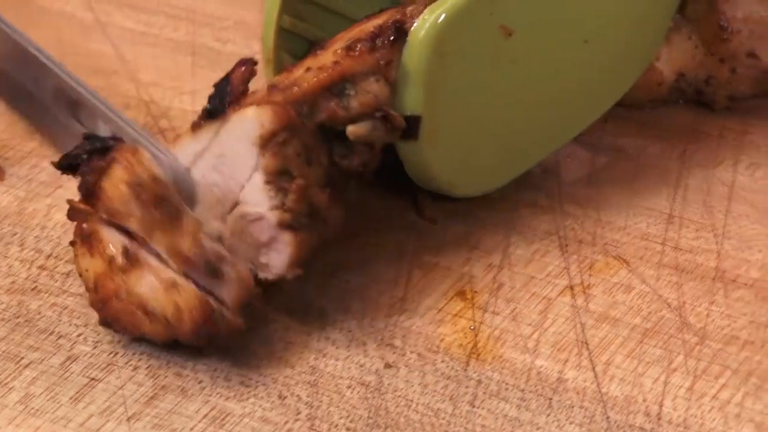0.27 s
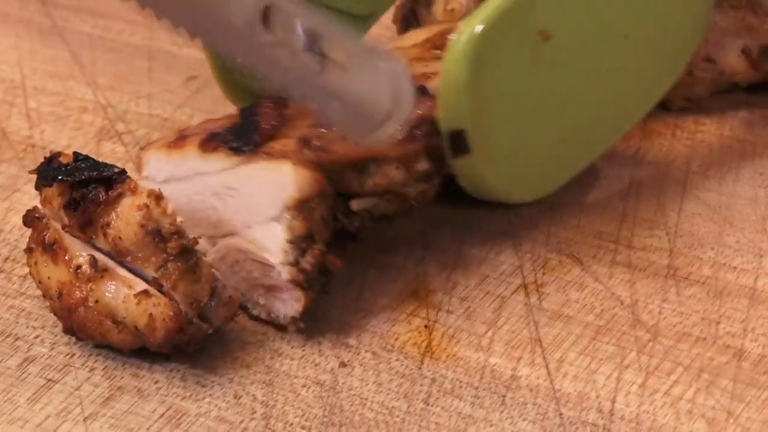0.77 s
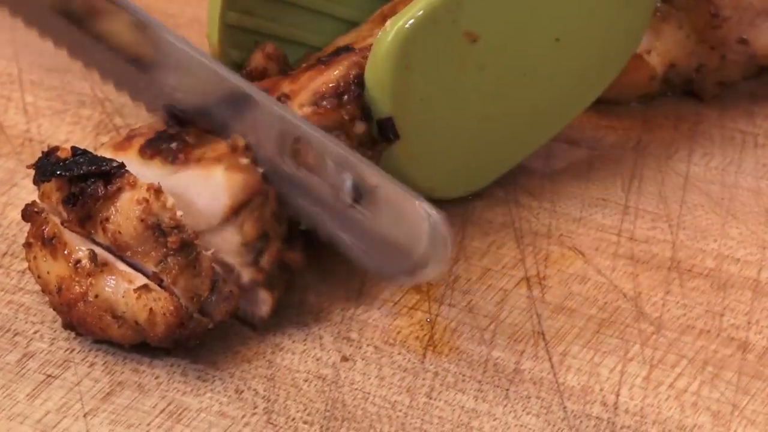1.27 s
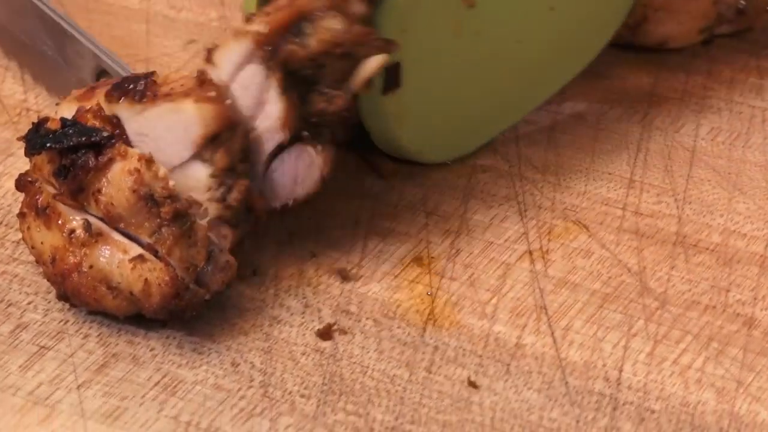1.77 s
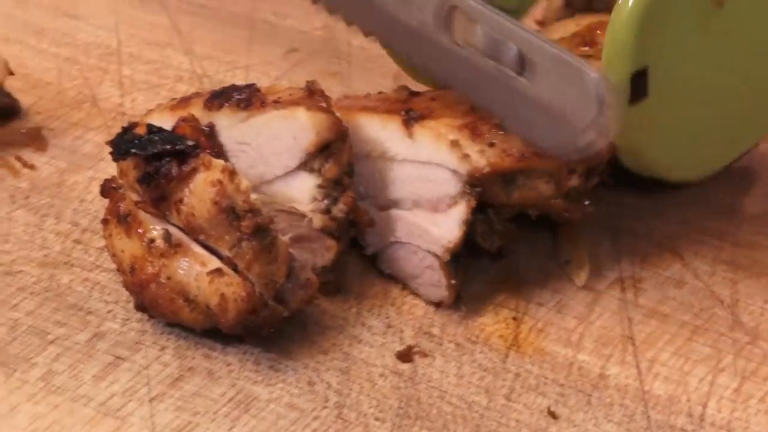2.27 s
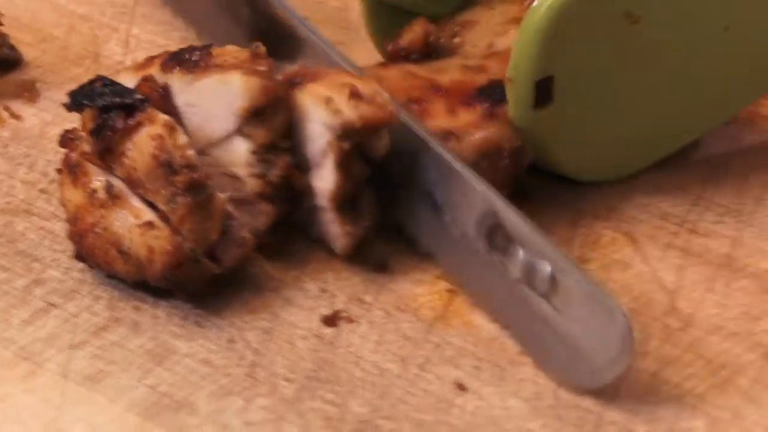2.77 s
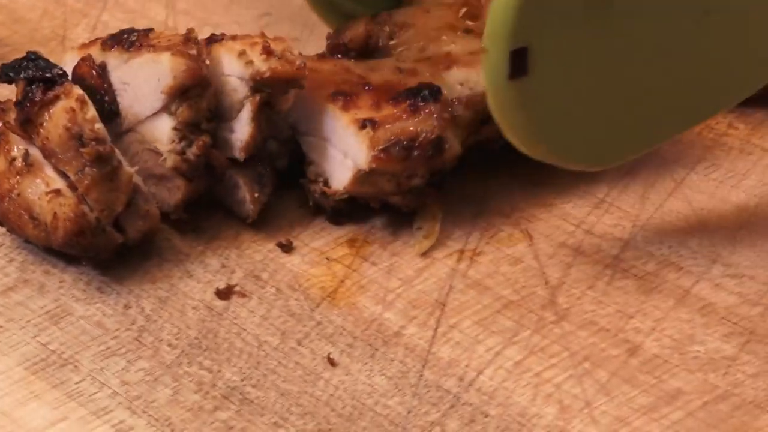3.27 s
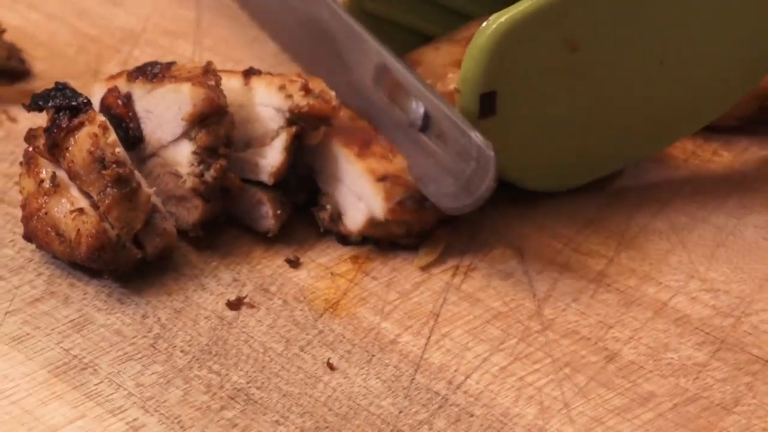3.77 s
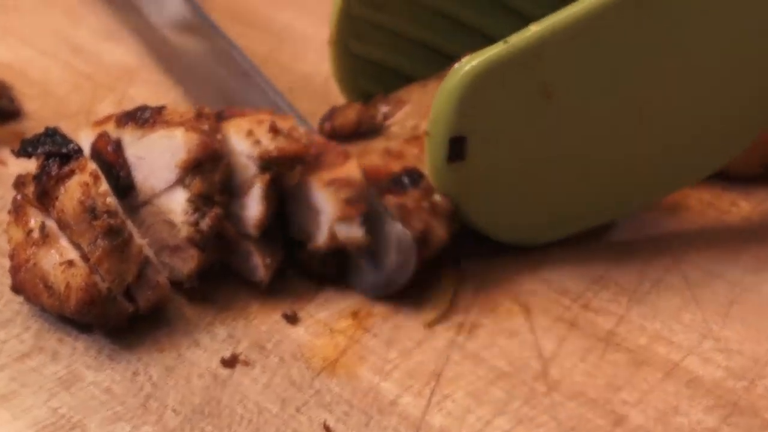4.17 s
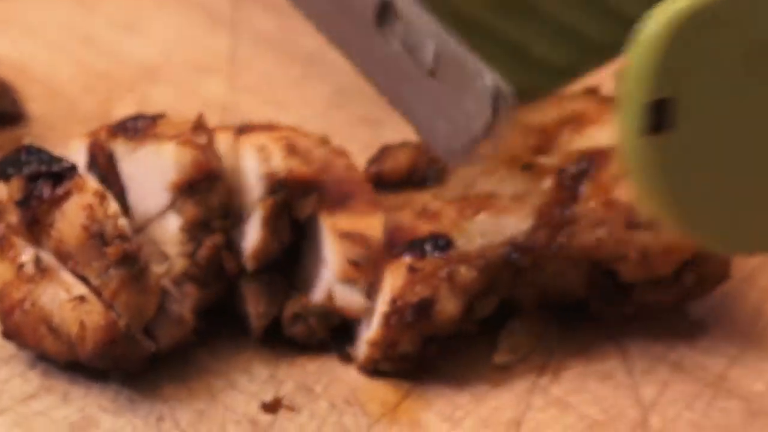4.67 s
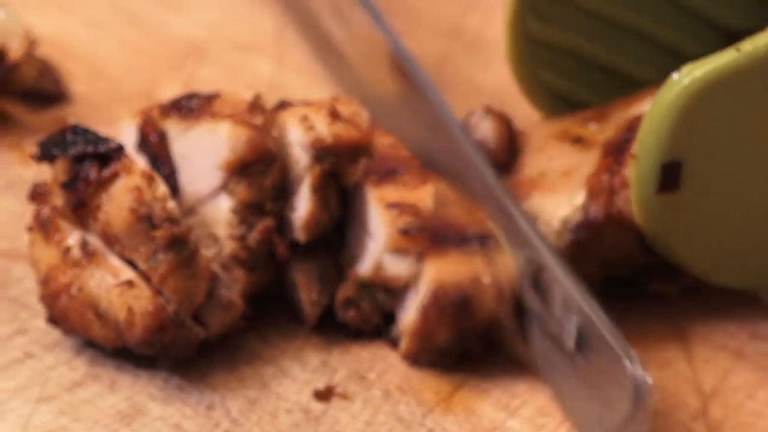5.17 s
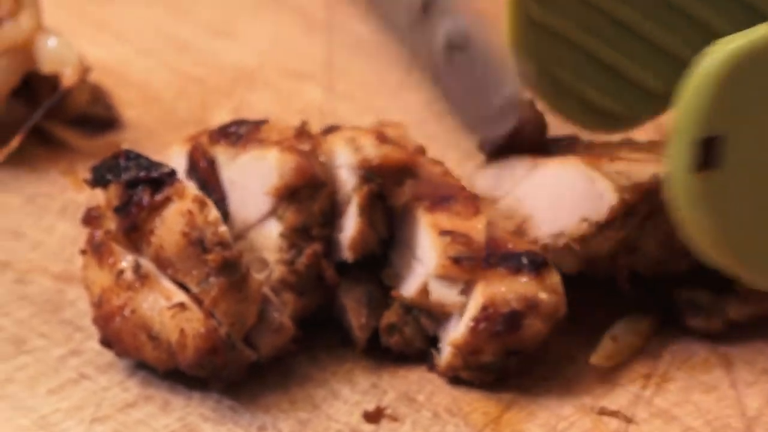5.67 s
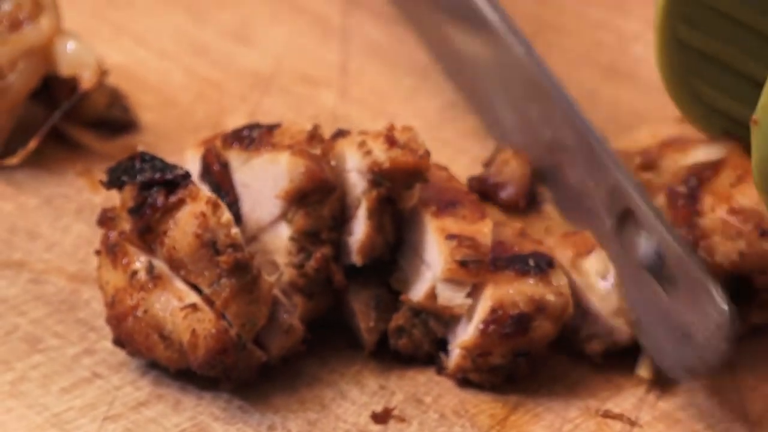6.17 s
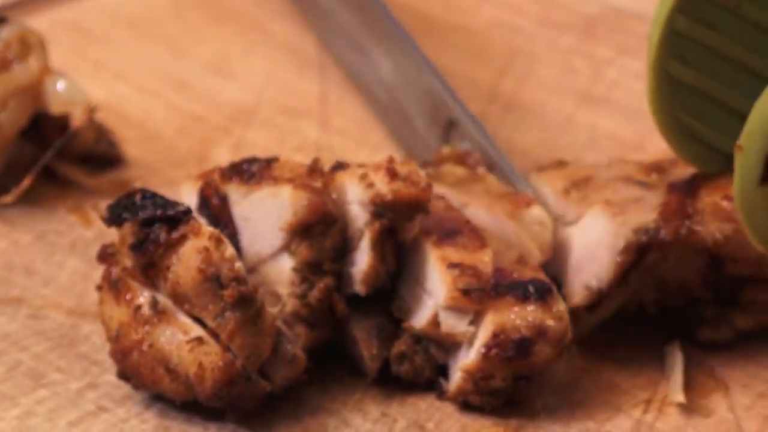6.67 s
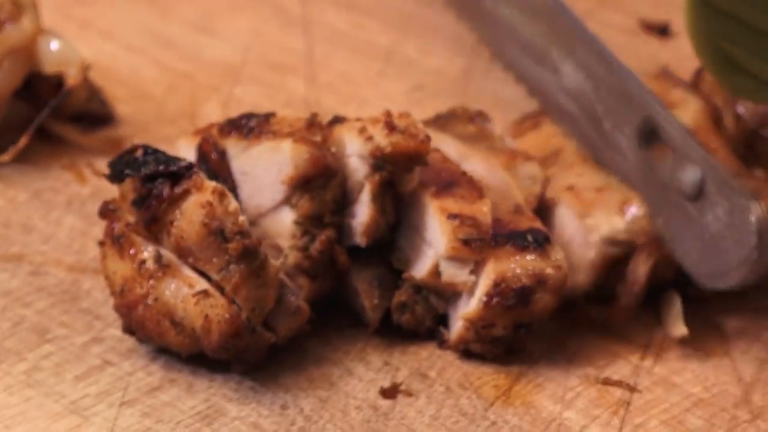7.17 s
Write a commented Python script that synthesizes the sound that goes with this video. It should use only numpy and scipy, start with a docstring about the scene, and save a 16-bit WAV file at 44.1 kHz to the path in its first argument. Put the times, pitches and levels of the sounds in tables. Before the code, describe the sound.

An electric knife is already running and cutting at 0 s, close to a mono microphone in a kitchen with a faint, short, dull reverberation. The motor strains in a rough buzzing grind, with small board thumps, until the blades lift at about 0.35 s. Freed, they clatter brightly and fast, with metallic hiss; the speed climbs, stumbling briefly near 0.75 s. Slices follow at roughly 1.3-1.9, 2.6-3.2, 3.8-4.4, 5.1-5.6 and 6.2-6.75 s. Each begins with blades slapping on the skin and a thin rising whine, then the clatter is damped, the pitch sags, and gears sing coarsely over pulsing steel swishes, with dull snags near the end. Between slices the loud rattle returns and the motor recovers, with gear and ringing swells around 2.3, 3.55, 4.9, 6.05 and 7.15 s. A last cut starts at 7.3 s and the buzz ends abruptly, unfinished, around 7.4 s.

```python
"""At a kitchen worktop, heard close in one channel with a faint wash from the walls, an electric knife saws chicken.
It runs without a stop: the end of one slice, five whole slices and the start of another, on a wooden board.
A small motor turns a worm wheel that shuttles two blades about 40 to 46 times a second. In the air the loose
blades clatter, made of noise bursts; in the meat they are pressed tight, the motor sags, the gear sings in
repeating tooth flaws and the blades swish once a stroke in coloured noise. Drone, hum, mesh and whine are sines."""
import sys
import numpy as np
from scipy import signal
from scipy.fft import rfft, irfft
from scipy.io import wavfile
from scipy.ndimage import uniform_filter1d

SR = 44100
rng = np.random.default_rng(int(sys.argv[2]) if len(sys.argv) > 2 else 0)


def file_out(sig):
    """Save sig as 16-bit WAV at sys.argv[1]."""
    # one column per channel
    cols = np.atleast_2d(sig).T
    # limit, then scale
    lim = np.clip(cols, -1, 1)
    pcm = np.round(lim * 32767).astype(np.int16)
    wavfile.write(sys.argv[1], SR, pcm)


N = 327222

# Partials of the drone that the regular clatter of the free blades makes:
# (order [multiples of the stroke rate]) and (relative level [dB])
DRONE_ORDERS = [11, 13, 14, 15, 16, 18, 19, 20, 23, 27, 28, 29, 33]
DRONE_PARTIAL_DB = [-16, -12, 0, -12, -4.5, -2, -10, -10, -13, -6.5, -9, -10, -12]
# Partials of the gear mesh: (order [multiples of the stroke rate]) and (relative level [dB])
MESH_ORDERS = [21, 24, 30, 36]
MESH_PARTIAL_DB = [-1.3, -11, -9, -9]
HUM_ORDER, WHINE_ORDER = 10.5, 84  # multiples of the stroke rate

# Swells of the mesh tone and of the whine as the blades bite:
# (start [s], full [s], breaks off [s], level when full [dB], level at the end [dB])
MESH_SWELLS = [(-.1, 0, .34, -44.5, -45.5), (1.44, 1.54, 1.92, -46, -44), (2.8, 2.89, 3.13, -40.5, -46),
               (3.86, 3.93, 4.06, -44.5, -44), (4.06, 4.11, 4.36, -39.5, -50),
               (5.28, 5.39, 5.6, -43.5, -46), (6.37, 6.48, 6.72, -45, -44)]
WHINE_SWELLS = [(1.3, 1.48, 1.62, -42, -44.5), (1.72, 1.78, 1.93, -50, -49), (2.1, 2.35, 2.62, -48, -49),
                (2.62, 2.77, 2.92, -41, -42), (3.92, 4.0, 4.17, -40.5, -45), (4.85, 5.1, 5.17, -43, -43.5),
                (5.17, 5.21, 5.44, -41, -50), (5.98, 6.26, 6.57, -42.5, -43), (6.98, 7.22, 7.5, -42, -44)]
STEADY_WHINE_DB, STEADY_MESH_DB, RELEASE_S = -53, -58, .045

# The slices: (blades enter [s], meat clamps them [s], fully buried [s], lifted out [s], drag [strokes/s])
SLICES = [(-.4, -.2, -.1, .366, 1.716), (1.311, 1.41, 1.593, 1.919, 2.953),
          (2.582, 2.83, 2.93, 3.165, 2.998), (3.799, 3.91, 4.042, 4.36, 3.238),
          (5.093, 5.24, 5.475, 5.63, 3.584), (6.199, 6.45, 6.52, 6.753, 3.267),
          (7.308, 7.5, 7.554, 7.8, 2.558)]
LIFT_S = .1  # time to pull the blades out of the meat
LEAN_S = .35  # the blades lean on the skin this long before they enter
CLAMP_S, CLAMP_SHARE = .03, .35  # how fast the clamp closes; its share (0-1) of the damping

# The motor creeps up to its top speed and answers a load with a lag
TOP_SPEED, START_SHORTFALL = 46.41, 3.77  # strokes/s
START_SAG = 2.37  # strokes/s lost to the cut already under way
RUN_UP_S, MOTOR_LAG_S = 3.014, .308
# The motor's one stumble: (start [s], slowest [s], speed lost [strokes/s], recovery [s])
STUMBLE = (.72, .80, 3.26, .294)

# Base loudness of each part: (in the air [dB], entering [dB], buried [dB], per sag [dB per stroke/s],
# per run-up still to go [dB per stroke/s], per unit of swell [dB])
PART_LEVELS = { "clatter": (-35, -34, -41.5, 0.2, 0.44, -0.5), "gear": (-35, -36, -26, -3, -1.2, 3.5),
               "ring": (-35.5, -37, -37.5, -2.5, -1.44, 2),
               "swish": (-29.5, -32.5, -37.5, 0.03, -0.5, -0.05), "drone": (-41.8, -50, -57, -1.5, -2.1, 0),
               "hum": (-54.5, -53, -52.5, -1.5, -1.8, 0), }
ENTERING_DEPTH, BURIED_DEPTH = 0.2, 1  # depths (0-1) at which those levels are reached
# Slow random wavering in level of clatter, gear, ring, swish, drone and hum
WOBBLE_DB, WOBBLES_PER_S = 0.66, 7
# Moments when the gear noise and the blade ring swell, then ease: (time of the height [s], strength [1])
GEAR_RING_SWELLS = [(.8, 1.2), (2.33, 1.5), (3.55, 0.88), (4.93, 0.55), (6.06, 0.84), (7.165, 1.1)]
SWELL_WIDTH_S = 0.14

# Blades snag in the meat: (time [s], spread [s], lift of the thump [dB])
SNAGS = [(.128, .012, 11), (.178, .012, 8), (1.675, .04, 12), (3.007, .012, 11), (3.053, .012, 15),
         (4.022, .012, 12), (4.11, .03, 9), (4.229, .012, 14), (5.4, .02, 8), (5.505, .03, 8),
         (6.608, .015, 11), (6.669, .012, 11)]
# Colour of the board under the meat: (frequency [Hz], relative level [dB])
THUMP_COLOUR = [(30, -34), (90, -12), (200, -3), (380, 0), (600, -5), (1500, -18), (6000, -42)]
THUMP_DB, THUMP_UNEVEN_DB, THUMP_PLACE = -62.5, 3, .29  # place in the stroke, 0-1

# Colour of the gear: (frequency [Hz], relative level [dB])
GEAR_COLOUR = [(30, -66), (80, -72), (250, -14.5), (450, -8), (850, 1.5), (1050, 1), (1400, 3.5), (2000, 2),
               (2700, -3), (3600, -3), (4400, -5.5), (6000, -7), (8000, -25.5), (16000, -23)]
# Resonances of the gear: (centre [Hz], width [Hz], lift, negative for a dip [dB])
GEAR_MODES = [(935, 44, -0.061), (1560, 800, -1.8)]
GEAR_LOW_CUT_HZ = 400  # the small gear radiates no bass
RETURN_PLACE, RETURN_DB = .79, -4  # the slack closes again on the way back, relative to the way out

# Blades slap together on the skin: (time of the height [s], spread [s], level [dB])
SLAPS = [(1.0, .1, -41), (1.33, .06, -38.5), (2.2, .08, -43), (2.56, .08, -41), (3.82, .07, -42),
         (5.0, .12, -43), (6.15, .12, -43), (6.98, .12, -41)]
# Colour of the slaps: (frequency [Hz], relative level [dB])
SLAP_COLOUR = [(100, -40), (400, -14), (800, -2), (1500, -3), (2700, 4), (4000, -8), (7000, -9),
               (8000, -17), (16000, -24)]
SLAP_PLACE, SLAP_DECAY_S = .025, .0007

# Knocks of the loose blades: (place in the stroke [0-1], scatter [strokes], clack [relative dB],
# thud [relative dB])
KNOCKS = [(.005, .012, -1, -2), (.05, .012, 0, -2), (.35, .012, -5, 0), (.505, .012, -.5, -4),
          (.59, .018, -1.5, 1), (.78, .012, -7, -20), (.87, .012, -6, -14)]
# Colour of the clatter: (frequency [Hz], relative level [dB])
CLATTER_COLOUR = [(25, -47), (45, -26), (85, -17.5), (200, -8.5), (440, -4.5), (620, 1), (815, 4),
                  (1030, -1.5), (1400, -0.5), (2000, 0), (3500, -4.5), (4500, -4), (7000, -2.5),
                  (16000, -17)]
# Resonances of blades and housing: (centre [Hz], width [Hz], lift, negative for a dip [dB])
BLADE_MODES = [(690, 110, 1), (837, 39, 4.5), (1305, 200, 3), (2500, 210, 5), (2826, 350, 8),
               (3530, 140, 7.5), (6730, 290, 13), (7350, 1930, -24.5)]
CUSHION_DB = -13  # level change of the thuds when the meat clamps fully
# Resonances the knocks bring out: (time of the height [s], spread [s], centre [Hz], width [Hz], level [dB])
RATTLES = [(.52, 0.13, 2460, 450, -43.5), (.8, 0.092, 3170, 1000, -39), (1.27, .1, 2740, 220, -43),
           (2.0, 0.16, 2540, 350, -48), (2.3, .1, 3400, 800, -46), (2.5, .11, 2740, 220, -45),
           (3.3, 0.068, 2520, 350, -46), (3.52, .1, 3600, 500, -48), (3.77, 0.077, 2730, 200, -43),
           (4.55, 0.063, 2600, 500, -49), (4.95, 0.15, 2820, 240, -44), (5.38, 0.057, 2140, 700, -40),
           (6.05, .12, 3620, 500, -42), (6.1, .15, 2760, 220, -42.5), (6.87, .08, 2790, 260, -41),
           (7.17, 0.093, 3500, 550, -36), (7.3, .1, 2740, 240, -45)]

# Rubs in each stroke: (place [0-1], shift when bent [strokes], decay of power [strokes], in the air [relative dB],
# half buried [relative dB], buried [relative dB], extra into the ring [dB])
RUBS = [(.04, -.03, .07, 8, 14, 8, 0), (.17, 0, .06, 2, -8, -10, 4), (.375, -.1, .055, 9.5, 12, 18.5, -2),
        (.53, -.015, .055, 9.5, 12.5, 5, -3), (.61, .02, .06, 2, 1, 6, 6), (.72, .05, .045, -1, -3, 10, 1),
        (.87, -.07, .05, 6, 4, 0, -1)]
RUB_ATTACK = .01  # strokes
KNOCK_GRIP, KNOCK_GRIP_S = 0.035, .002  # exponent and time: free blades rub harder while they knock
# Resonances the rubbing brings out: (time of the height [s], spread [s], centre [Hz], width [Hz], level [dB])
SQUEAKS = [(.36, .05, 9850, 400, -51), (.75, .1, 6100, 1500, -37), (1.03, 0.24, 6800, 450, -43),
           (1.1, .12, 12300, 500, -53), (1.25, 0.25, 9800, 450, -50), (1.88, .025, 2900, 900, -38),
           (2.07, .14, 12400, 600, -42), (2.2, .09, 10000, 400, -43), (2.25, 0.064, 5900, 1800, -33),
           (2.8, 0.051, 9850, 450, -44), (3.27, .08, 12700, 700, -41), (4.1, 0.28, 5930, 500, -41),
           (5.15, .07, 9900, 450, -43), (5.37, .04, 14050, 450, -47), (6.35, 0.099, 5940, 600, -43),
           (6.77, 0.03, 9850, 400, -47), (7.35, .1, 9780, 450, -52)]
# The blade ring follows the point where the blades touch: (time [s], centre [Hz])
RING_CENTRE = [(.45, 5880), (.7, 6623), (1.2, 6810), (1.5, 5900), (1.9, 5720), (2.25, 6550), (2.6, 6470),
               (2.85, 5890), (7.42, 5744)]

# Colour of the swish: (frequency [Hz], relative level [dB])
SWISH_COLOUR = [(1000, -35.5), (3000, 3.5), (4600, 0), (5300, 4.5), (6300, 2), (7100, 1.5), (7900, -7),
                (8700, 0.5), (11000, -2), (13200, 0), (14300, -6.5), (16000, -4)]
# High resonances of the steel: (centre [Hz], width [Hz], lift [dB])
STEEL_MODES = [(6810, 440, 3), (9730, 550, 3.5), (12200, 700, 1)]
# The swish echoes along the steel from the point of contact, which slides as the blades sink and wander
ECHO_S, ECHO_SHARE = 0.000708, 0.27  # lag at depth 0 without wander; gain of the echo
ECHO_SLIDE, ECHO_WANDER = 0.27, 0.094  # shares of that lag

CUTOFF_HZ = 15800  # top of what the microphone channel passes


def from_db(db):
    """Decibels to gain."""
    return 10 ** (np.asarray(db) / 20)


def rms_one(x):
    """Scale to unit power."""
    return x / np.sqrt(np.mean(x ** 2) + 1e-20)


def in_time(rows):
    """Each column of a curve at every sample."""
    s, *columns = np.transpose(rows)
    return [np.interp(np.arange(N) / SR, s, column) for column in columns]


def hump(s, width_s):
    """A smooth rise and fall around one moment, height 1."""
    return np.exp(-.5 * ((np.arange(N) / SR - s) / width_s) ** 2)


def drift(rate):
    """Smooth chance with rms 1, changing about rate times a second."""
    steps = np.arange(N) / SR * rate
    return rms_one(np.interp(steps, np.arange(N // 8), rng.standard_normal(N // 8)))


def highpass(x, order, hz):
    """Take out what lies below hz."""
    return signal.sosfilt(signal.butter(order, hz, "high", fs=SR, output="sos"), x)


def colour(x, spectrum, modes=()):
    """Pass through a causal (minimum-phase) body with this spectrum and these resonances; rms 1."""
    size = 8192
    hz = np.maximum(np.arange(size // 2 + 1) * SR / size, 1)
    points = np.array(spectrum)
    db = np.interp(np.log(hz), np.log(points[:, 0]), points[:, 1])
    for centre, width, lift in modes:
        db = db + lift / (1 + (2 * (hz - centre) / width) ** 2)
    # folding the cepstrum onto positive times makes the response minimum-phase
    cepstrum = irfft(np.log(from_db(db)))
    response = irfft(np.exp(rfft(2 * cepstrum[:size // 2], size)))
    return rms_one(signal.oaconvolve(x, response[:size // 2])[:N])


def clicks_at(strokes, places, sizes):
    """One click wherever the running stroke count passes one of the places."""
    at = np.interp(places, strokes, np.arange(N), left=N, right=N).astype(int)
    return np.bincount(at.ravel(), sizes.ravel(), N + 1)[:N]


def rasp(clicks, decay):
    """Every contact scrapes for a moment: noise whose amplitude dies with a time constant of decay seconds."""
    power = signal.lfilter([1], [1, -np.exp(-2 / (decay * SR))], clicks ** 2 + 1e-18)
    return rms_one(np.sqrt(power) * rng.standard_normal(N))


def resonances(drive, rows):
    """As the contact moves along the steel, one resonance after another swells and fades."""
    out = 0
    for s, spread_s, hz, width_hz, db in rows:
        edges = [hz - width_hz / 2, hz + width_hz / 2]
        band = signal.butter(1, edges, "band", fs=SR, output="sos")
        out = out + from_db(db) * hump(s, spread_s) * rms_one(signal.sosfilt(band, drive))
    return out


def kitchen(x, t60, wet_db):
    """Worktop and walls return a short, dull wash of decaying noise behind the close sound."""
    t = np.arange(SR // 2) / SR
    tail = rng.standard_normal(len(t)) * from_db(-60 * t / t60) * (t > .004)
    tail = signal.sosfilt(signal.butter(1, 5000, fs=SR, output="sos"), tail)
    return x + from_db(wet_db) * signal.oaconvolve(x, tail / np.linalg.norm(tail))[:N]


def cutting():
    """Each slice bends, takes in, clamps and frees the blades: depth, bend, clamp (0-1) and motor drag."""
    t = np.arange(N) / SR
    depth, bend, clamp, drag = 0, 0, 0, 0
    for enter, clamped, buried, lifted, pull in SLICES:
        def course(start, full):
            return np.interp(t, [start, full, lifted - LIFT_S / 2, lifted + LIFT_S / 2], [0, 1, 1, 0])
        sunk = course(enter, buried)
        depth = depth + sunk
        bend = bend + course(enter - LEAN_S, buried)
        clamp = clamp + course(clamped - CLAMP_S, clamped)
        drag = drag + pull * sunk
    return depth, bend, clamp, drag


def motor(drag):
    """What holds the motor below top speed (strokes/s): sag under load, the slow run-up, the stumble."""
    t = np.arange(N) / SR
    keep = np.exp(-1 / (MOTOR_LAG_S * SR))
    sag = signal.lfilter([1 - keep], [1, -keep], drag) + START_SAG * np.exp(-t / MOTOR_LAG_S)
    shortfall = START_SHORTFALL * np.exp(-t / RUN_UP_S)
    start, slowest, lost, recovery = STUMBLE
    stumble = np.interp(t, [start, slowest], [0, lost]) * np.exp(-np.maximum(t - slowest, 0) / recovery)
    return sag, shortfall, stumble


def swelling():
    """How far gear and ring swell."""
    return sum(strength * hump(s, SWELL_WIDTH_S) for s, strength in GEAR_RING_SWELLS)


def loudness(part, depth, sag, shortfall, swell):
    """A part's gain follows blade depth, how freely the motor runs and how far gear and ring swell."""
    air_db, entering_db, buried_db, sag_db, shortfall_db, swell_db = PART_LEVELS[part]
    db = np.interp(depth, [0, ENTERING_DEPTH, BURIED_DEPTH], [air_db, entering_db, buried_db])
    db = db + sag_db * sag + shortfall_db * shortfall + swell_db * swell
    return from_db(db + WOBBLE_DB * drift(WOBBLES_PER_S))


def tone(strokes, orders, levels_db, flutter, flutter_rate):
    """Sines locked to the drive, each fluttering in strength and phase."""
    out = 0
    for order, db in zip(orders, levels_db):
        angle = 2 * np.pi * (order * strokes + rng.random()) + flutter * drift(flutter_rate)
        out = out + from_db(db) * (1 + flutter * drift(flutter_rate)) * np.sin(angle)
    return out * np.sqrt(2)


def singing(rows, steady_db):
    """Gain of a tone that is always faint, swells now and then, holds and breaks off."""
    t = np.arange(N) / SR
    swells = 0
    for start, full, stop, full_db, stop_db in rows:
        gains = [0, from_db(full_db), from_db(stop_db), 0]
        swells = swells + np.interp(t, [start, full, stop, stop + RELEASE_S], gains)
    return np.hypot(swells, from_db(steady_db))


def thumps(strokes, depth):
    """Buried blades tug at the meat once a stroke and thump the board, much harder where they snag."""
    turn = np.arange(int(strokes[-1]) + 1)
    uneven = from_db(THUMP_UNEVEN_DB * rng.standard_normal(len(turn)))
    tugs = clicks_at(strokes, turn + THUMP_PLACE, uneven)
    steady = clicks_at(strokes, turn + THUMP_PLACE, np.ones(len(turn)))
    snagged = sum((from_db(db) - 1) * hump(s, spread_s) for s, spread_s, db in SNAGS)
    return from_db(THUMP_DB) * colour(-(depth * tugs + snagged * steady), THUMP_COLOUR)


def gear(strokes, depth, jitter, grind_db, bite_place, bite_db, low_cut_hz, size=1024):
    """The flaws of the teeth come round again every stroke; under load the slack closes with a knock."""
    # one stroke of tooth flaws: equal partials in random phase
    flaws = rms_one(irfft(np.exp(2j * np.pi * rng.random(size // 2 + 1)), 4 * size))
    turning = strokes + jitter * drift(300)
    buzz = np.interp(turning % 1, np.linspace(0, 1, len(flaws)), flaws) * (1 + 0.24 * drift(120))
    turn = np.arange(int(strokes[-1]))
    out = clicks_at(strokes, turn + bite_place, np.ones(len(turn)))
    back = clicks_at(strokes, turn + RETURN_PLACE, np.ones(len(turn)))
    bite = rasp(out + from_db(RETURN_DB) * back, decay=0.00055)
    grind = from_db(grind_db) * (1 - 0.72 * depth) * rng.standard_normal(N)
    force = buzz + grind + from_db(bite_db) * depth * bite
    return colour(highpass(force, 2, low_cut_hz), GEAR_COLOUR, GEAR_MODES)


def slaps(strokes):
    """One short, hard clack per stroke while the blades rest on the skin."""
    turn = np.arange(int(strokes[-1]) + 1)
    contacts = clicks_at(strokes, turn + SLAP_PLACE, np.ones(len(turn)))
    clacks = colour(rasp(contacts, SLAP_DECAY_S), SLAP_COLOUR)
    return clacks * sum(from_db(db) * hump(s, spread_s) for s, spread_s, db in SLAPS)


def clatter(strokes, clamp, uneven_db, bounce_strokes, bounce_db, thud_db, cushion_db, decay, count=5):
    """Loose blades knock at set places in each stroke, and every knock chatters on in small bounces."""
    turn = np.arange(int(strokes[-1]) + 1)[:, None]
    knocks, bounces, blows = 0, 0, 0
    for place, scatter, clack_db, weight_db in KNOCKS:
        when = turn + place + scatter * rng.standard_normal(turn.shape)
        size = from_db(clack_db + uneven_db * (2 * rng.random(turn.shape) - 1))
        knocks = knocks + clicks_at(strokes, when, size)
        later = bounce_strokes * rng.exponential(1, (len(turn), count))
        bounce_size = size * from_db(bounce_db) * rng.random(later.shape)
        bounces = bounces + clicks_at(strokes, when + later, bounce_size)
        weight = from_db(weight_db + 4.6 * rng.standard_normal(turn.shape))
        blows = blows + clicks_at(strokes, when, weight * rng.choice([-1, 1], turn.shape))
    scrapes = highpass(rasp(knocks + bounces, decay), 3, 440)
    # the knocks also thud through the handle, unless the meat cushions them
    handle = signal.butter(2, [50, 520], "band", fs=SR, output="sos")
    thuds = rms_one(signal.sosfilt(handle, blows))
    thud_gain = from_db(thud_db + cushion_db * clamp)
    return colour(scrapes + thud_gain * thuds, CLATTER_COLOUR, BLADE_MODES)


def pressing(knocking, depth):
    """Each knock presses the free blades together for a moment, so they rub harder."""
    force = uniform_filter1d(knocking ** 2, size=int(KNOCK_GRIP_S * SR)) + 0.066
    return force ** (KNOCK_GRIP * (1 - depth))


def rubbing(strokes, depth, bend, between_db, grain_db, uneven_db, into_ring=False):
    """Steel slides on steel in bursts, sharp then dying; bending shifts where the blades touch."""
    power = from_db(between_db) ** 2
    for place, shift, length, air_db, entering_db, buried_db, ring_db in RUBS:
        since = (strokes - place - shift * bend + .5) % 1 - .5
        strength = np.interp(depth, [0, .5, 1], from_db([air_db, entering_db, buried_db]))
        strength = strength * from_db(ring_db * into_ring)
        fall = np.where(since < 0, .5 * (since / RUB_ATTACK) ** 2, since / length)
        power = power + strength ** 2 * np.exp(-fall)
    # level the strokes against each other, keeping the shape within them
    power = power / uniform_filter1d(power, size=4000)
    return rms_one(np.sqrt(power) * from_db(grain_db * drift(2500) + uneven_db * drift(150)))


def blade_ring(rub, width_hz):
    """The rubbing feeds one broad resonance whose centre wanders."""
    (hz,) = in_time(RING_CENTRE)
    push = rub * (rng.standard_normal(N) + 1j * rng.standard_normal(N))
    band = signal.sosfilt(signal.butter(2, width_hz / 2, fs=SR, output="sos"), push)
    # shift the low band up to the moving centre
    return rms_one(np.real(band * np.exp(2j * np.pi * np.cumsum(hz) / SR)))


def sliding_echo(x, depth):
    """A very short echo gives the treble resonances that glide with the point of contact."""
    n = np.arange(N)
    lag = ECHO_S * SR * (1 + ECHO_SLIDE * depth + ECHO_WANDER * drift(5))
    return rms_one(x + ECHO_SHARE * np.interp(n - lag, n, x))


def scene():
    """One drive moves every part of the knife."""
    depth, bend, clamp, drag = cutting()
    swell = swelling()
    sag, shortfall, stumble = motor(drag)
    speed = TOP_SPEED - shortfall - sag - stumble
    strokes = np.cumsum(speed * (1 + .0003 * drift(40))) / SR
    damping = (1 - CLAMP_SHARE) * depth + CLAMP_SHARE * clamp
    gain = {}
    for part in ("clatter", "gear", "ring", "swish"):
        gain[part] = loudness(part, damping, sag, shortfall, swell)
    # the drone and the hum also fade while the motor stumbles
    for part in ("drone", "hum"):
        gain[part] = loudness(part, depth, sag + stumble, shortfall, swell)

    drone = gain["drone"] * tone(strokes, DRONE_ORDERS, DRONE_PARTIAL_DB, flutter=.25, flutter_rate=40)
    hum = gain["hum"] * tone(strokes, [HUM_ORDER], [0], flutter=.15, flutter_rate=30)
    mesh = tone(strokes, MESH_ORDERS, MESH_PARTIAL_DB, flutter=.27, flutter_rate=80)
    mesh = mesh * singing(MESH_SWELLS, STEADY_MESH_DB)
    whine = tone(strokes, [WHINE_ORDER], [0], flutter=.21, flutter_rate=90)
    whine = whine * singing(WHINE_SWELLS, STEADY_WHINE_DB)

    wheel = gain["gear"] * gear(strokes, depth, jitter=0.0013, grind_db=3.5, bite_place=.25, bite_db=-5.0,
                                low_cut_hz=GEAR_LOW_CUT_HZ)
    knocking = clatter(strokes, clamp, uneven_db=2.2, bounce_strokes=.042, bounce_db=-9.5, thud_db=-13.0,
                       cushion_db=CUSHION_DB, decay=0.0018)
    loose = gain["clatter"] * knocking + resonances(knocking, RATTLES) + slaps(strokes)

    press = pressing(knocking, depth)
    rub = press * rubbing(strokes, depth, bend, between_db=-1.0, grain_db=2.0, uneven_db=0.6)
    friction = colour(rub * rng.standard_normal(N), SWISH_COLOUR, STEEL_MODES)
    swish = gain["swish"] * sliding_echo(friction, depth)
    squeaks = resonances(rub * rng.standard_normal(N), SQUEAKS)
    ring_rub = press * rubbing(strokes, depth, bend, between_db=-8, grain_db=2, uneven_db=1.2, into_ring=True)
    ring = gain["ring"] * blade_ring(ring_rub, width_hz=1060)

    contacts = loose + wheel + swish + squeaks + ring + thumps(strokes, depth)
    # only the contacts reach the room wash; the tones stay dry
    return (kitchen(contacts, t60=0.28, wet_db=-14.5) + drone + hum + mesh + whine)[None]


def record(dry):
    """The microphone channel rounds the highest peaks and cuts the deepest bass and the top."""
    top = .21  # amplitude that the rounded peaks approach
    rounded = highpass(top * np.tanh(dry / top), 2, 40)
    return signal.sosfilt(signal.ellip(12, .1, 90, CUTOFF_HZ, fs=SR, output="sos"), rounded)


dry = scene()
out = record(dry)
file_out(out)
```